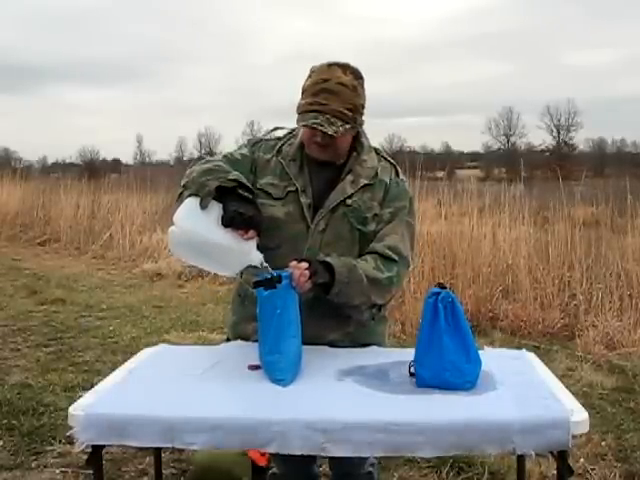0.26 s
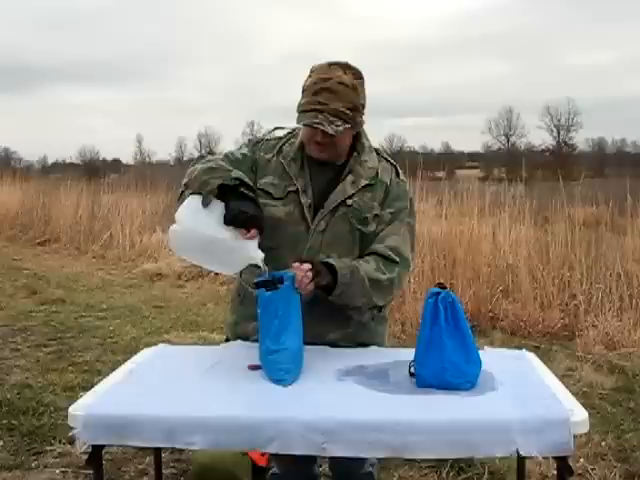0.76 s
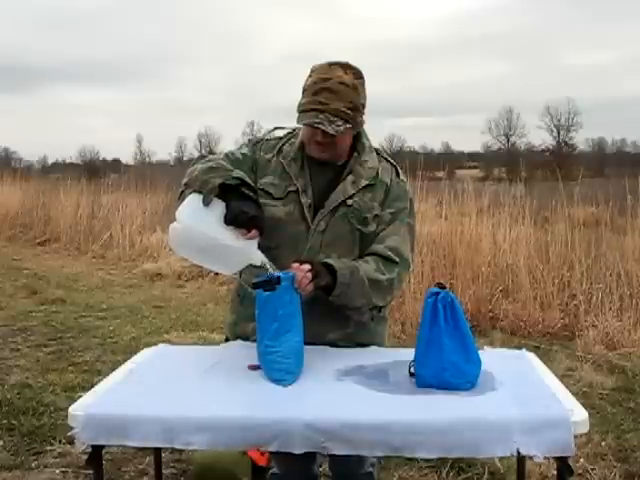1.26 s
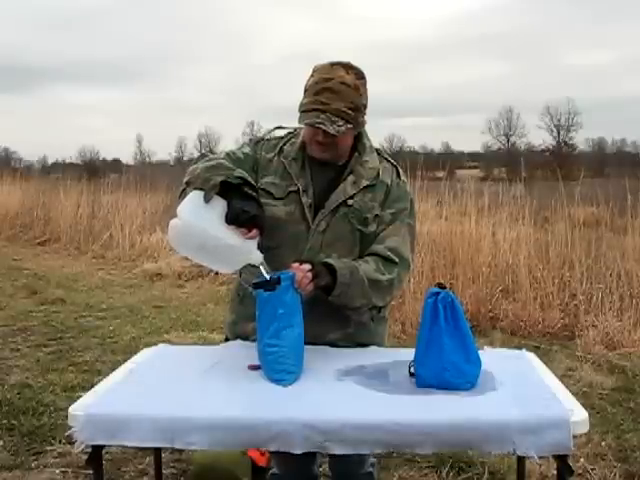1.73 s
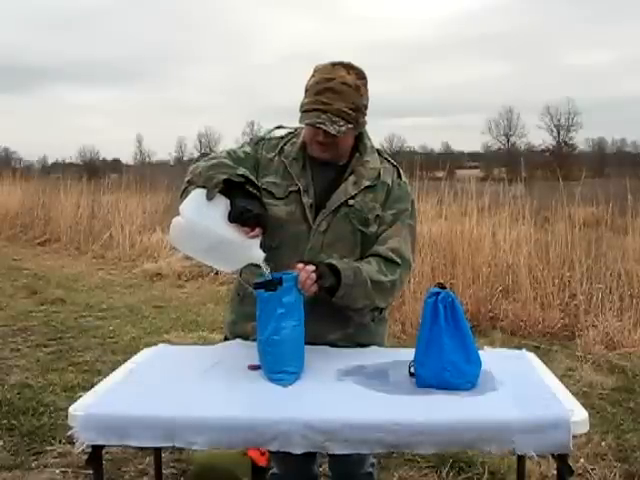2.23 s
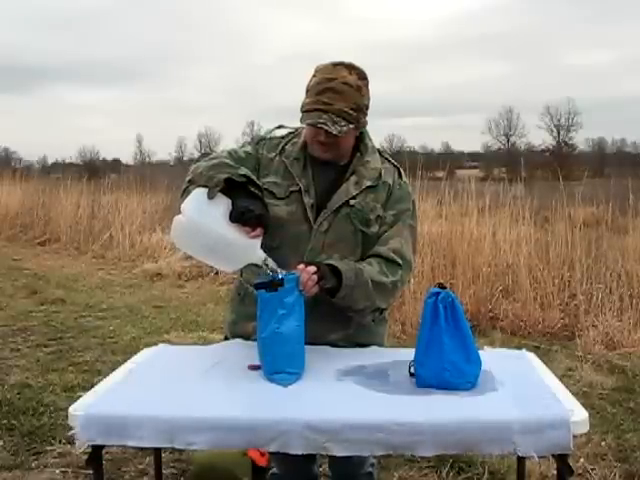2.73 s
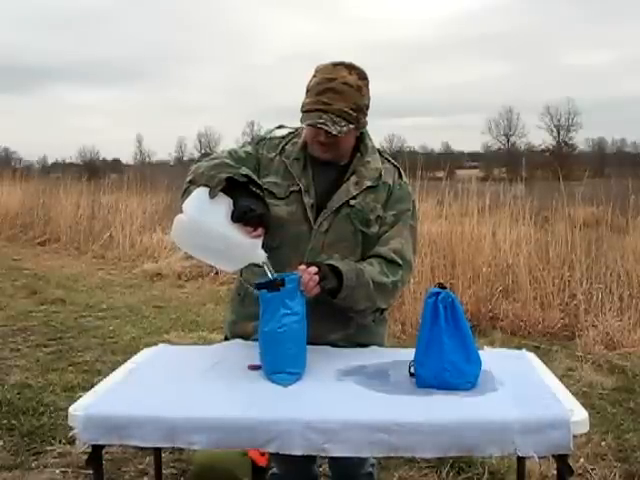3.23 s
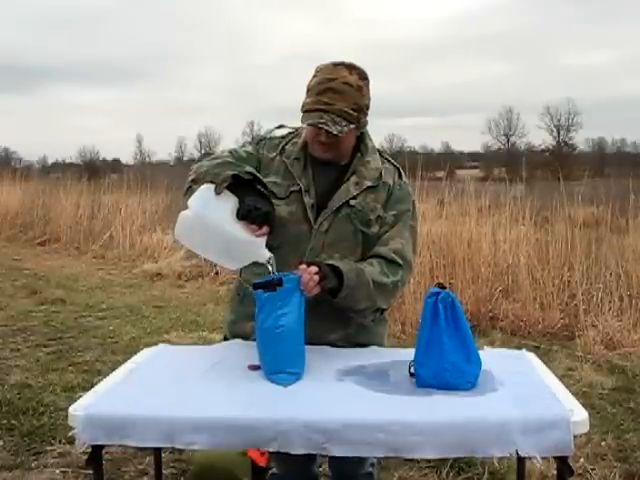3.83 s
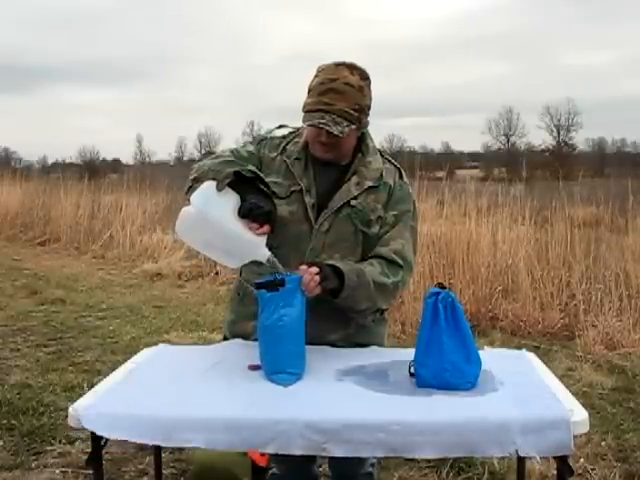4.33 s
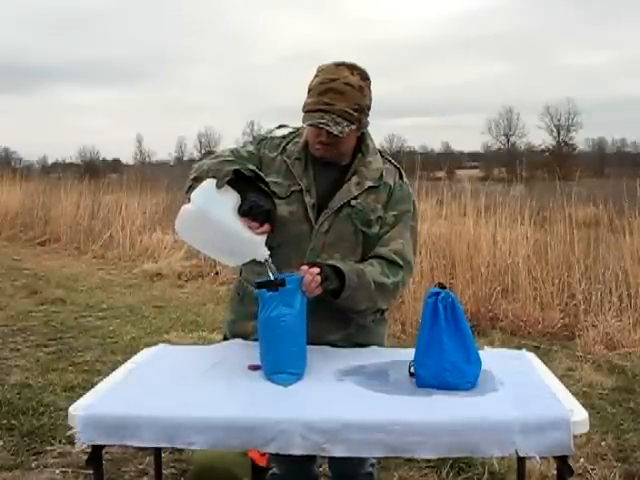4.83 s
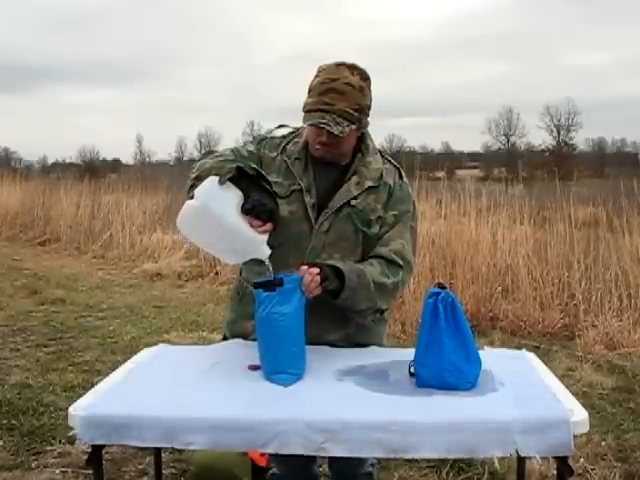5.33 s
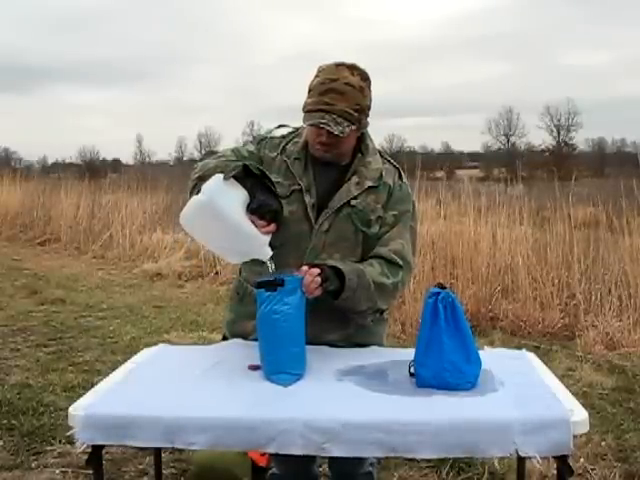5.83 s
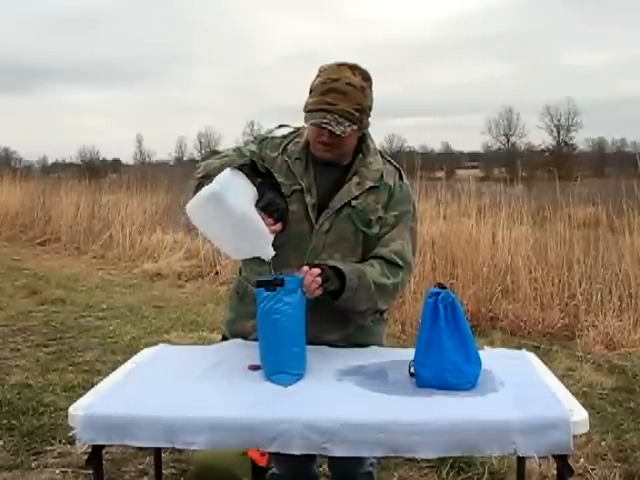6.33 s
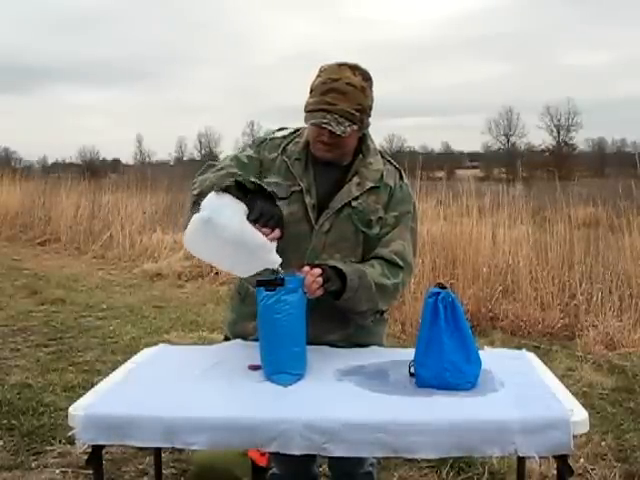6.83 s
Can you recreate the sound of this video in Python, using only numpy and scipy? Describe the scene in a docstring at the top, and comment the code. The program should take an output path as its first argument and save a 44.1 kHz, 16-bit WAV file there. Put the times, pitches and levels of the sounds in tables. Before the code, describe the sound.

A plastic jug is poured into a nylon bag in an open field, a few steps from a small camera microphone. Hollow glugs come roughly every 0.4 seconds over fizzy, gurgling water and little splats. The gulps get louder and firmer from the middle on, the stream thins near the end, and the last big gulp leaves a trickle. Faint hiss, light wind and a thin high whine lie beneath.

```python
"""Jug poured into a nylon bag

An open field, with the microphone of a small camera a few steps from the pour.
Water leaves a plastic jug; air gulps back and rings the air pocket, a bubble in the neck and the jug.
The stream lands in a nylon bag as a fizz and gurgle of many tiny ringing bubbles, with splats on top.
Light wind, as shaped noise and dying low sines, rumbles on the microphone.
Under it lie a faint hiss of shaped noise and a thin steady sine whine."""
import sys
import numpy as np
from scipy import signal
from scipy.fft import rfft, irfft, next_fast_len
from scipy.io import wavfile
from scipy.ndimage import uniform_filter1d

SR = 44100
rng = np.random.default_rng(int(sys.argv[2]) if len(sys.argv) > 2 else 0)


def wav_out(sig):
    """Save sig, one row per channel (or a flat mono array), as 16-bit PCM at SR to the path in sys.argv[1]."""
    wavfile.write(sys.argv[1], SR, np.round(np.clip(np.atleast_2d(sig).T, -1, 1) * 32767).astype(np.int16))


N = 311780


def gain_of(db):
    """Turns decibels into an amplitude factor."""
    return 10 ** (np.asarray(db) / 20)


def evened(x):
    """Brings x to rms 1."""
    return x / np.sqrt(np.mean(x ** 2) + 1e-20)


def curves(rows):
    """Draws every column after the first as a curve over all samples."""
    start_s, *columns = np.transpose(rows)
    return [np.interp(np.arange(N) / SR, start_s, column) for column in columns]


def coloured(x, points):
    """Filters x by a table of pitch_hz, gain_db, and brings it to rms 1."""
    size = next_fast_len(N)
    pitch_hz, gain_db = np.transpose(points)
    hz = np.fft.rfftfreq(size, 1 / SR)
    gain = gain_of(np.interp(np.log(hz + 1), np.log(pitch_hz + 1), gain_db))
    return evened(irfft(rfft(x, size) * gain, size)[:N])


def add(mix, start_s, sound):
    """Lays a sound into the mix, cut off at the end of the mix."""
    part = mix[round(start_s * SR):][:len(sound)]
    part += sound[:len(part)]


def ring(hz, t60, rise=0., attack=0.0029):
    """A dying sine whose pitch climbs by the share rise over its t60, as a bubble nearing the surface."""
    t60 = np.clip(t60, .002, 1)
    t = np.arange(int(t60 * SR)) / SR
    swing = np.sin(2 * np.pi * hz * (t + rise * t ** 2 / (2 * t60)))
    return swing * gain_of(-60 * t / t60) * (1 - np.exp(-t / attack))


def grains(lo_hz, hi_hz, cycles, per_s, spread_db, rise, count):
    """Random bubbles of many sizes; each rings for about the same number of cycles, a few are loud."""
    out = np.zeros(N)
    for hz in np.geomspace(lo_hz, hi_hz, count):
        at = rng.integers(0, N, int(per_s / count * N / SR))
        loudness_db = spread_db * np.minimum(rng.exponential(1, len(at)), 5)
        pops = np.bincount(at, gain_of(loudness_db), N)
        out += signal.oaconvolve(pops, ring(hz, cycles / hz, rise, attack=1 / hz))[:N]
    return evened(out)


SURGE_LEAD_S, SURGE_RISE_S, SURGE_FALL_S = .08, .045, .03  # full this long before a gulp; swell; thinning
SURGE_LAG_S, LAG_S_PER_DB = .0, -.003  # at a 0 dB gulp; a harder gulp cuts the surge off sooner


def surge_db():
    """Before each gulp the water rushes out, holds, and thins once the air is in; the strongest surge rules."""
    t = np.arange(N) / SR
    swells = []
    for start_s, level_db, *_, surge, _, _ in GULPS:
        swelling = (t - start_s + SURGE_LEAD_S) / SURGE_RISE_S
        thinning = (start_s + SURGE_LAG_S + LAG_S_PER_DB * level_db - t) / SURGE_FALL_S
        swells.append(surge * np.clip(np.minimum(swelling, thinning) + 1, 0, 1))
    return np.max(swells, axis=0)


# the stream at the bag, before surges, bursts and splats are laid on:
# start_s [s], fizz_db [dB before CALM_DB], gurgle_db [dB]
STREAM_LEVELS = [(0.0, -50, -53), (0.1, -42, -47), (0.62, -44, -44), (1.3, -42.5, -43), (2.4, -43, -44),
                 (2.75, -42, -42), (3.0, -43, -46), (3.6, -43, -47), (4.05, -48, -56), (4.35, -44, -50),
                 (4.8, -46, -56), (5.3, -45, -50), (5.75, -46, -47), (5.95, -49.5, -46), (6.2, -48, -48),
                 (6.32, -52, -56), (6.5, -51, -62), (6.7, -47.5, -50), (7.07, -49, -56)]
# tone of the fizz: pitch_hz [Hz], gain_db [dB, relative]
FIZZ_TONE = [(590, -21), (1000, -15.5), (1190, -3), (1310, -9.5), (1540, 0.5), (1790, -13.5), (1980, -0.5),
             (2180, -9.5), (2530, 1.5), (2970, -2.5), (3510, 1), (4450, 0.5), (5400, -6), (6680, -17),
             (8680, -57), (14700, -120)]
CALM_DB = -2.  # trim of the fizz without splats
GURGLE_FOLLOWS = .6  # share of the surge, in dB, that the gurgle takes
BURST_UNDER_DB, BURST_T60_S = -16, .17  # the gurgle bursts with each gulp
SPRAY_UNDER_DB, STIR_UNDER_DB, SPRAY_T60_S = -23., -28., .25  # what a splat leaves in fizz and gurgle


def stream():
    """Bubbles small and large ring where the water lands in the bag: fine fizz over mid gurgle."""
    fizz_db, gurgle_db = curves(STREAM_LEVELS)
    surge = surge_db()
    t = np.arange(SR // 2) / SR
    gurgling = gain_of(gurgle_db + GURGLE_FOLLOWS * surge)
    for start_s, level_db, *_ in GULPS:
        add(gurgling, start_s, gain_of(level_db + BURST_UNDER_DB - 60 * t / BURST_T60_S))
    spraying = gain_of(fizz_db + surge + CALM_DB)
    for start_s, level_db, _ in SPLATS_ON_BAG:  # every splat throws up spray and stirs the gurgle
        dying_db = level_db - 60 * t / SPRAY_T60_S
        add(spraying, start_s, gain_of(dying_db + SPRAY_UNDER_DB) * (1 - np.exp(-t / .004)))
        add(gurgling, start_s, gain_of(dying_db + STIR_UNDER_DB))
    # splashes land in clumps
    flicker = evened(uniform_filter1d(uniform_filter1d(rng.standard_normal(N), 500), 500))
    fizz = grains(1087, 5955, cycles=28., per_s=6500., spread_db=3.5, rise=0.056, count=30)
    fizz = coloured(fizz + 0.45 * rng.standard_normal(N), FIZZ_TONE)
    fizz = evened(fizz * gain_of(2.2 * flicker))
    gurgle = grains(500, 980, cycles=22.0, per_s=450., spread_db=3.5, rise=0.049, count=14)
    return fizz * spraying + gurgle * gurgling


# rumble of the wind on the microphone: start_s [s], level_db [dB rms]
WIND_LEVELS = [(0.0, -49), (2.3, -46), (3.0, -49), (4.75, -49), (5.02, -41), (5.3, -51), (5.7, -48),
               (6.0, -54), (7.07, -52)]
# tone of the rumble: pitch_hz [Hz], gain_db [dB, relative]
RUMBLE_TONE = [(8.8, -48), (15, -11), (59, 7), (92, 1), (204, -8), (255, -2.5), (298, -11.5), (340, -24.5),
               (440, -46), (750, -120)]
# puffs that thump the microphone: start_s [s], level_db [dB], pitch_hz [Hz]
WIND_THUMPS = [(5.052, -15, 70), (5.082, -8, 112), (5.096, -14, 74.7), (5.112, -11, 80)]


def wind():
    """Air pushes on the microphone: low noise of lumpy level, and a few thumps as dying low sines."""
    lumps = evened(uniform_filter1d(uniform_filter1d(rng.standard_normal(N), 1500), 1500))
    rumble = evened(coloured(rng.standard_normal(N), RUMBLE_TONE) * gain_of(1.7 * lumps))
    out = rumble * gain_of(curves(WIND_LEVELS)[0])
    for start_s, level_db, pitch_hz in WIND_THUMPS:
        add(out, start_s, gain_of(level_db) * ring(pitch_hz, 3.5 / pitch_hz, attack=0.0026))
    return out


# tone of the hiss of field and camera: pitch_hz [Hz], gain_db [dB, relative]
HISS_TONE = [(59, -29), (100, 2), (272, -3), (400, 7), (742, 12), (900, 6.5), (1190, -7), (1760, -11),
             (1950, -12.5), (3490, -15), (4380, -9), (5300, -15), (6680, -35), (8680, -87.5), (14700, -120)]
HISS_DB = -52  # rms
# the thin whine: pitch_hz [Hz], level_db [dB rms]
WHINE_TONES = [(4290, -58)]


def background():
    """Steady hiss of field and camera as shaped noise, with one thin whine as a sine."""
    t = np.arange(N) / SR
    out = gain_of(HISS_DB) * coloured(rng.standard_normal(N), HISS_TONE)
    for pitch_hz, level_db in WHINE_TONES:
        out += np.sqrt(2) * gain_of(level_db) * np.sin(2 * np.pi * pitch_hz * t)
    return out


# splats of water on nylon and water: start_s [s], level_db [dB peak], pitch_hz [Hz, centre]
SPLATS_ON_BAG = [(0.067, -20, 4020), (0.1052, -26, 3310), (0.2186, -21.5, 4000), (0.2522, -25.5, 3800),
                 (0.502, -19, 2520), (0.5441, -23, 1310), (0.6403, -27, 4400), (0.6833, -27, 3010),
                 (0.7008, -25, 2940), (0.826, -27, 1320), (0.882, -25, 2550), (0.943, -27, 2600),
                 (0.9792, -28, 2680), (1.0276, -28, 2870), (1.063, -25, 2600), (1.0838, -27, 2010),
                 (1.1, -26, 4000), (1.125, -27, 4600), (1.1757, -27, 1600), (1.3184, -26, 3730),
                 (1.3563, -27, 2550), (1.417, -27, 3700), (1.425, -26, 3500), (1.5923, -26, 5400),
                 (1.6751, -28, 2810), (1.7, -29, 1180), (1.7205, -27, 3350), (1.7669, -26, 3320),
                 (1.8113, -26, 2730), (1.8282, -24, 1570), (1.8941, -26, 2560), (1.915, -23, 2580),
                 (1.9829, -24, 1490), (2.0023, -22, 2620), (2.1246, -28, 3780), (2.141, -24, 2480),
                 (2.2222, -29.5, 2480), (2.3333, -22.5, 3910), (2.4904, -25.5, 3960), (2.503, -27, 2000),
                 (2.552, -25, 1200), (2.567, -27, 2600), (2.601, -28, 4400), (2.6344, -25, 1480),
                 (2.663, -27, 4200), (2.724, -27, 3500), (2.7935, -27, 2060), (2.8273, -22, 4430),
                 (2.8546, -21, 3450), (2.9148, -30, 1490), (2.972, -28, 2700), (2.998, -27, 1250),
                 (3.025, -25, 1460), (3.092, -21, 3780), (3.251, -22, 1120), (3.3708, -24.5, 4000),
                 (3.4121, -27, 1140), (3.466, -26, 4000), (3.5793, -29, 3380), (3.6418, -25, 3890),
                 (3.683, -21.5, 1465), (3.7534, -27, 4820), (3.7973, -20, 1570), (3.9075, -30.5, 3100),
                 (3.9962, -26, 2870), (4.0105, -19, 3220), (4.127, -24.5, 1200), (4.1708, -24.5, 1270),
                 (4.2473, -22, 2740), (4.2985, -26, 3050), (4.3974, -31, 1530), (4.4986, -26, 2710),
                 (4.535, -26, 3200), (4.5498, -27, 1480), (4.5843, -21, 1524), (4.7, -30, 2500),
                 (4.7705, -27, 1150), (4.805, -30, 2600), (4.909, -21.5, 2830), (4.9594, -21, 1300),
                 (5.0577, -26, 4600), (5.119, -22, 3960), (5.1567, -27, 1490), (5.183, -21.5, 1550),
                 (5.254, -30, 2610), (5.2999, -24.5, 1100), (5.3737, -23, 1190), (5.581, -26, 2000),
                 (5.6092, -31, 2100), (5.62, -28, 1750), (5.6511, -29, 4000), (5.675, -33, 2700),
                 (5.7448, -31, 3400), (5.774, -25, 1175), (5.796, -29, 1510), (5.8242, -33, 1500),
                 (5.841, -23, 3200), (5.845, -25, 1500), (5.9948, -33, 1550), (6.045, -29, 1550),
                 (6.137, -31, 2100), (6.1578, -27, 1610), (6.225, -32, 1500), (6.2552, -32, 2450),
                 (6.5812, -23, 1520), (6.588, -29, 1180), (6.788, -32, 3700), (6.8544, -35, 2370),
                 (6.9597, -32, 1250)]
# modes of the air in the bag: pitch_hz [Hz], level_db [dB, relative]
BAG_MODES = [(1175, -1), (1510, 0), (2040, -2), (2600, 0), (3330, -1), (3900, -2), (4420, -3), (5300, -9)]
SPLAT_T60_S, SPLAT_CYCLES, SPRAY_CYCLES = .006, 36., 22.  # larger bubbles ring longer
SPLAT_SPREAD_S, SPLAT_WIDTH = .01, .62  # latest droplet; width in log pitch around the centre


def splats():
    """Each splat rings at its centre pitch; within milliseconds its droplets ring nearby modes of the bag."""
    out = np.zeros(N)
    all_draws = rng.random((len(SPLATS_ON_BAG), 3, len(BAG_MODES), 2))
    for (start_s, level_db, hz), draws in zip(SPLATS_ON_BAG, all_draws):
        cluster = np.zeros(SR // 5)
        add(cluster, 0, 1.05 * ring(hz, SPLAT_T60_S + SPLAT_CYCLES / hz, 0.034, attack=0.0016))
        for droplet in draws:
            for (mode_hz, mode_db), (late, off) in zip(BAG_MODES, droplet):
                nearness = np.exp(-(np.log(mode_hz / hz) / SPLAT_WIDTH) ** 2)
                gain = gain_of(mode_db - 14 * late) * nearness  # later droplets are weaker
                droplet_hz = mode_hz * (1 + .14 * (off - .5))
                tone = ring(droplet_hz, SPRAY_CYCLES / mode_hz, 0.06, attack=1.5 / mode_hz)
                add(cluster, late * SPLAT_SPREAD_S, gain * tone)
        add(out, start_s, gain_of(level_db) * cluster / abs(cluster).max())
    return out


# single gurgling bubbles that stand out: start_s [s], level_db [dB], pitch_hz [Hz]
CLEAR_BUBBLES = [(0.118, -27, 762), (0.431, -31, 960), (0.501, -28, 683), (0.89, -26, 850),
                 (0.912, -32, 680), (0.948, -29, 800), (1.096, -25.5, 860), (1.72, -23.5, 500),
                 (1.819, -19.5, 882), (1.855, -21.5, 750), (2.062, -30, 750), (2.141, -24, 770),
                 (2.232, -27, 720), (2.253, -21, 767), (2.397, -20, 650), (2.423, -24.5, 770),
                 (2.662, -27, 670), (2.724, -25.5, 780), (2.809, -24, 685), (2.873, -22.5, 742),
                 (3.187, -23.5, 810), (3.234, -19.5, 719), (3.27, -27, 1130), (3.39, -31, 680),
                 (3.518, -28, 800), (3.682, -27, 650), (3.985, -31, 750), (4.222, -12, 620),
                 (4.243, -16, 690), (4.633, -14, 640), (4.768, -33.5, 925), (4.902, -27.5, 580),
                 (4.96, -31, 643), (5.119, -26, 772), (5.277, -21, 708), (5.373, -28, 577),
                 (5.755, -28, 740), (5.966, -28, 620), (6.085, -28, 600), (6.245, -30, 650),
                 (6.29, -34, 650), (6.376, -29, 643), (6.425, -19, 550), (6.583, -34, 590),
                 (6.712, -36, 781), (6.912, -31, 732), (6.964, -31, 657)]
BUBBLE_T60_S, BUBBLE_S_PER_DB = .055, -.002  # at -25 dB; louder bubbles burst sooner


def bubbles():
    """Each clear bubble is a short rising ring, with a slightly weaker neighbour, a little larger or smaller,
    just after."""
    out = np.zeros(N)
    twins = rng.uniform(-0.83, 1, len(CLEAR_BUBBLES))
    for (start_s, level_db, hz), twin in zip(CLEAR_BUBBLES, twins):
        t60 = BUBBLE_T60_S + BUBBLE_S_PER_DB * (level_db + 25)
        add(out, start_s, gain_of(level_db) * ring(hz, t60, 0.17, attack=0.001))
        add(out, start_s + .006, gain_of(level_db - 0.5) * ring(hz * (1 + .2 * twin), t60, 0.038))
    return out


# upper modes of the jug, rung by every gulp:
# pitch_hz [Hz], level_db [dB, relative, before the brightness of the gulp], t60_s [s]
JUG_MODES = [(340, -7, .03), (425.4, -5, 0.058), (530, -11, .04), (740, -11, .04), (875, -11, 0.04),
             (1010, -20, .03), (1173, -15, .03), (1319, -18, .03), (1620, -25, 0.042), (2000, -13, 0.017),
             (2550, -22, .015), (3200, -29, .012)]
BRIGHT_DB, BRIGHT_PER_DB = 3., .15  # at a 0 dB gulp; a harder gulp rings the upper modes more
CHURN_T60_S, CHURN_S_PER_DB = .17, -.008  # at a 0 dB gulp; a harder gulp churns more briefly
POCKET_T60_S, POCKET_S_PER_DB = .025, -.0025  # at 0 dB; a harder gulp breaks the pocket up sooner
AFTER_DB = -5.5  # once the neck closes the churn drops by this much, then dies


def gulp(db, air_hz, neck_hz, air_db, open_s, knock, kicks):
    """Two knocks and a churn, full while the neck is open, ring the air pocket, neck bubble and jug."""
    t = np.arange(len(kicks)) / SR
    gushing = 1 / (1 + (t / max(open_s, .002)) ** 8)
    churn_t60 = max(CHURN_T60_S + CHURN_S_PER_DB * db, .01)
    churn = kicks * (gushing + (1 - gushing) * gain_of(AFTER_DB - 60 * t / churn_t60))
    add(churn, 0, np.array([1.5 * knock]))  # the neck starts to clear
    add(churn, 1 / air_hz, np.array([3.5 * knock]))  # and opens one swing of the pocket later
    body = np.zeros(SR // 4)
    add(body, 0, gain_of(1.5) * ring(neck_hz, 0.042, -0.014, attack=0.0013))
    # the pocket shrinks and its pitch climbs
    pocket = ring(air_hz, POCKET_T60_S + POCKET_S_PER_DB * db, .1, attack=.002)
    add(body, 0, gain_of(air_db) * pocket)
    add(body, 0, gain_of(air_db - 13) * ring(air_hz * 1.04, .17, attack=.008))  # and hums on faintly
    # the slug of water thuds back
    add(body, 0, gain_of(air_db - 6.5) * ring(air_hz * .72, .04, .2, attack=.003))
    for mode_hz, mode_db, t60 in JUG_MODES:
        mode_gain = gain_of(mode_db + BRIGHT_DB + BRIGHT_PER_DB * db)
        add(body, 0, mode_gain * ring(mode_hz, t60, attack=0.0015))
    # keeps the gulp free of rumble below about 110 Hz
    bass_cut = signal.butter(2, 110, "high", fs=SR, output="sos")
    sound = signal.sosfilt(bass_cut, signal.fftconvolve(churn, body))
    return gain_of(db) * sound / abs(sound).max()


# gulps of air into the jug: start_s [s], level_db [dB peak], air_hz [Hz, air pocket],
# neck_hz [Hz, bubble in the neck], air_db [dB, pocket over neck bubble before their fixed trims],
# slosh_db [dB against the gulp], surge_db [dB, of the stream], open_s [s, neck open],
# knock [firmness of the first knocks, relative]
GULPS = [(0.153, -21.5, 252, 624, -1, -15, 6, .04, .4), (0.215, -22.5, 260, 756, -3.5, -24, 3, .015, .6),
         (0.254, -25.5, 321, 755, -4, -29, 3, .015, .6), (0.484, -17.5, 252, 595, -1.5, -25, 4, .03, .3),
         (0.57, -20.5, 259, 592, 1, -28.5, 4, .01, 1.1), (0.828, -16, 253, 638, -4.5, -22, 3, .04, .45),
         (1.186, -16, 274, 634, -4, -24, 6, .032, .45), (1.567, -15, 254, 558, -4, -30, 4, .03, .3),
         (1.937, -12.5, 280, 580, -9.5, -25, 6, .022, .5), (2.308, -13.5, 296, 587, -7, -22, 6, .03, .5),
         (2.679, -24.5, 242, 680, -1, -13, 5, .03, .4), (2.767, -26.5, 188, 728, 2, -14, 2, .015, .6),
         (3.046, -11.5, 284, 650, -7.5, -22, 6, .025, .6), (3.432, -5.5, 284, 643, -5, -28, 7, .028, .8),
         (3.813, -4.5, 296, 646, -12, -32, 7, .007, 1.1), (4.214, -10, 260, 615, -6, -26, 8, .014, .3),
         (4.6, -6.5, 188, 590, -8.5, -24.5, 8, .03, 1.1), (4.989, -5.5, 208.5, 611, -8.5, -21, 8, .018, .6),
         (5.173, -23.5, 229, 670, 8, -28, 3, .015, .8), (5.388, -8, 222, 570, 2.5, -26, 6, .015, .9),
         (5.579, -22, 250, 608, 3, -16, 3, .025, .7), (5.636, -24.5, 226, 743, 3, -15, 2, .025, .6),
         (5.854, -6, 215, 630, 5.5, -24, 2, .014, .9), (6.132, -20, 277, 680, -1, -13, 3, .03, .5),
         (6.398, -4, 205, 625, 2, -31, 0, .012, .7)]
SLOSH_S = .38  # the slosh holds at first, then has died by this time


def jug():
    """Air gulps into the jug; after each gulp the water rocks with a low slosh that dies away."""
    out, rocking = np.zeros(N), np.full(N, gain_of(-61))
    shape = (len(GULPS), 12000)
    kicks = 1.05 * rng.standard_normal(shape) * (rng.random(shape) < 1500 / SR)  # about 1500 a second
    t = np.arange(SR // 2) / SR
    for row, row_kicks in zip(GULPS, kicks):
        start_s, level_db, air_hz, neck_hz, air_db, slosh_db, _, open_s, knock = row
        add(out, start_s - .002, gulp(level_db, air_hz, neck_hz, air_db, open_s, knock, row_kicks))
        sloshing = gain_of(level_db + slosh_db - 60 * (t / SLOSH_S) ** 2)
        add(rocking, start_s, sloshing * (1 - np.exp(-t / 0.015)))
    slosh = grains(170, 330, cycles=14., per_s=300., spread_db=2.5, rise=0.14, count=8)
    return out + rocking * slosh


def scene():
    """Everything that reaches the microphone, as one channel."""
    return (stream() + wind() + background() + splats() + bubbles() + jug())[None]


EDGE_HZ = 6830  # top of the camera's band


def record(dry):
    """Gain control ducks milliseconds after loud sound, the preamplifier squeezes peaks, a low-pass limits the band."""
    power_db = 10 * np.log10(abs(uniform_filter1d(dry[0] ** 2, 300)) + 1e-12)
    fall = np.arange(N) * 68.0 / SR  # the held level falls by this many dB a second
    held_db = np.maximum.accumulate(power_db + fall) - fall
    over_db = np.maximum(held_db + 21.0, 0)  # above a threshold of -21 dB
    late_db = signal.lfilter([.004], [1, .004 - 1], over_db)  # lags by about 6 ms
    ducked = dry / gain_of(0.17 * late_db)
    squeezed = .5 * np.tanh(ducked / .5)
    low_pass = signal.firwin(401, EDGE_HZ, window=("kaiser", 9), fs=SR)
    return signal.oaconvolve(squeezed, low_pass[None], "same")


dry = scene()
out = record(dry)
wav_out(out)
```